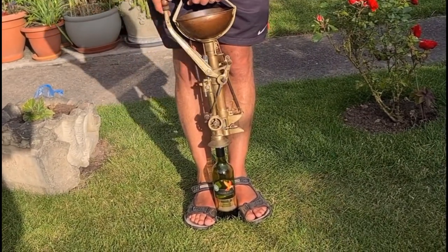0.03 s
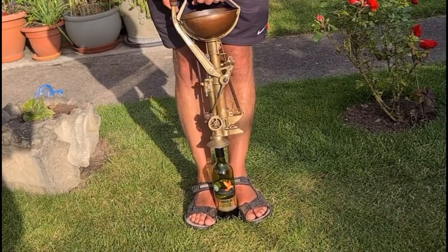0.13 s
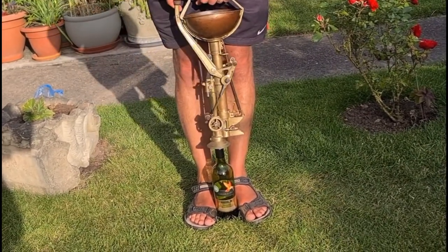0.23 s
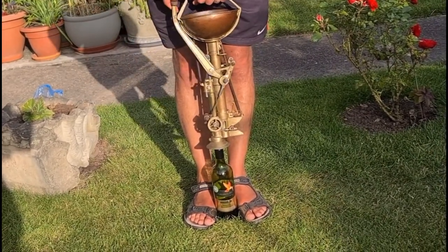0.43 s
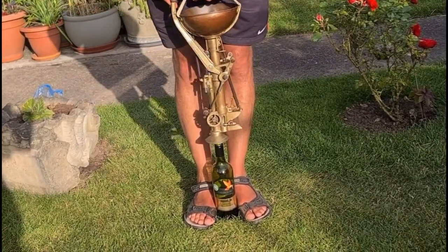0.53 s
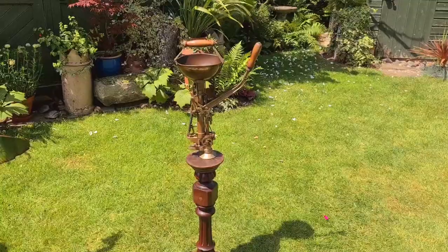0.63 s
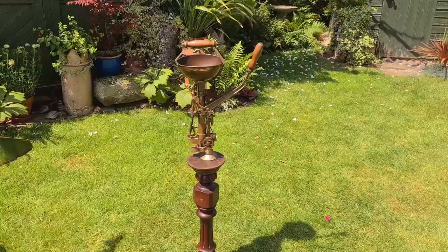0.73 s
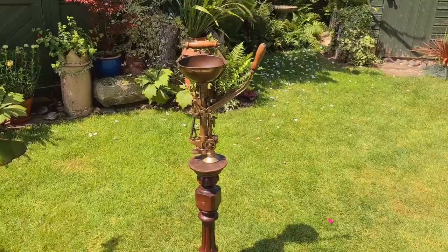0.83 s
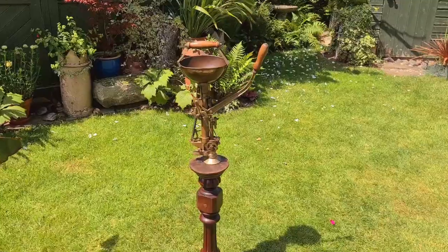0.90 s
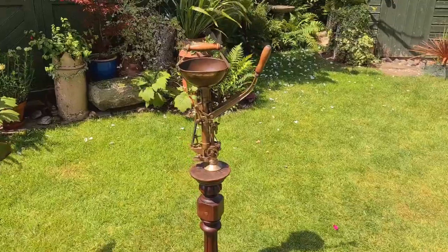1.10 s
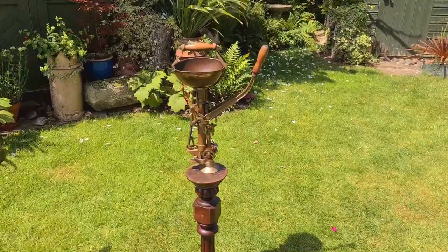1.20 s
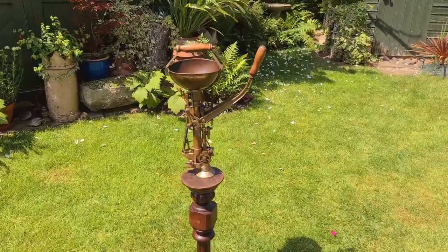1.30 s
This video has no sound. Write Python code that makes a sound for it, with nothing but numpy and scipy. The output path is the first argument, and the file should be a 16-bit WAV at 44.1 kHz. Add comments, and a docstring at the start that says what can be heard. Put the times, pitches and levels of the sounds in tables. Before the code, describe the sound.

A brass lever corker scrapes briefly, seats a cork with a soft knock and gives one sharp, rattling clack. Small birds chirp faintly in the garden. The background cuts out, then wind rumbles and thumps lightly on the microphone.

```python
"""A brass lever corker in a garden. Small birds chirp over calm air. The lever scrapes, the cork seats
with a soft knock, noise swells briefly, and at 0.2 s the plunger hits its stop: one chattering clack,
scattered by fences and the house wall. More chirps and two faint low bumps follow. At 0.63 s the garden
drops out; a breezier spot fades in with rumble, leaf hiss, a far motor's hum and wind thumps on the
microphone."""
import sys
import numpy as np
from scipy import signal
from scipy.fft import rfft, irfft
from scipy.io import wavfile

SR = 44100
rng = np.random.default_rng(int(sys.argv[2]) if len(sys.argv) > 2 else 0)


def store_pcm(level_fs):
    """Save levels as 16-bit WAV."""
    pcm = np.round(np.clip(level_fs, -1, 1) * 32767).astype(np.int16)
    wavfile.write(sys.argv[1], SR, np.atleast_2d(pcm).T)


N = 59535
T = np.arange(N) / SR

# calm air spectrum: freq_hz, level_db
CALM_SPECTRUM = [(25, -12.5), (65, 2), (110, -5.5), (160, -11), (230, -16.5), (370, -12.5), (600, -19.5),
                 (1000, -22), (1700, -27), (2400, -33.5), (3700, -23.5), (5200, -32.5), (7000, -42),
                 (10000, -48.5), (15500, -49.5)]
# bird notes: start_s, length_s, start_hz, end_hz, level_db
CHIRPS = [(-.003, .018, 3770, 3593, -54), (0.009, 0.022, 3400, 2994, -57), (0.03, 0.019, 3200, 2950, -62),
          (0.519, 0.021, 3400, 3740, -68), (0.567, 0.021, 4830, 4703, -61), (0.594, 0.013, 4776, 4600, -57),
          (0.601, 0.0101, 4840, 3570, -55), (0.616, 0.011, 4505, 3950, -58),
          (0.63, 0.0117, 4220, 3700, -56.5)]
# scrapes, last row a noise swell just before the clack: start_s, swell_s, level_db, t60_s, lowpass_hz
SCRAPES_AND_SWELL = [(.068, .006, -50.5, .07, 8500), (0.084, 0.0029, -49, 0.18, 7700),
                     (0.105, 0.0018, -55.5, 0.13, 7900), (0.1625, 0.0046, -40, 0.067, 16000),
                     (0.174, .003, -45, 0.07, 14000), (0.1807, 0.0014, -37, 0.039, 18000),
                     (0.191, 0.0077, -28.5, 0.089, 8360)]
# friction spectrum: freq_hz, level_db
FRICTION_SPECTRUM = [(300, -13.5), (1000, -7.5), (1600, -16), (2800, -8), (4300, -13), (5500, -5),
                     (7500, -4), (10000, -11), (13000, -5.5), (15500, -18.5)]
# cork in the bottle neck: pitch_hz, level_db, t60_s, left_minus_right_db
CORK_MODES = [(376, -9.5, .09, 3.5), (650, -2.5, 0.027, 4.5), (630, 2.5, 0.036, -0.5),
              (1000, -11, 0.0067, 4)]
# brass frame: pitch_hz, level_db, t60_s, left_minus_right_db
FRAME_MODES = [(496, -25, 0.036, -1.5), (730, -12, 0.036, -4), (1009, -6, .024, -2),
               (1217, -14.5, 0.073, 0.5), (1606, -1.5, 0.066, 5), (1790, -4, 0.045, 5.5),
               (2349, -31.5, 0.064, -1), (2473, -26, 0.11, 1.5), (5240, -4.5, .028, 2.5),
               (6294, -10, 0.09, 4), (7390, -18, .08, -3), (8245, -15.5, .08, -5)]
# plunger contacts with its stop: start_s, level_db
CONTACTS = [(.2034, 0), (.2050, 0), (.2085, -11), (.2150, -16), (.2203, -10.5), (.2287, -19)]
# dense ring of the small links: freq_hz, level_db
LINK_SPECTRUM = [(150, -24.5), (300, -13.5), (480, -4), (700, -3), (1100, -1), (1400, -3), (2200, -11.5),
                 (3000, -2), (3400, -5.5), (3900, -1.5), (4700, -4.5), (5300, 3.5), (5600, -0.5),
                 (6300, 1.5), (7000, 1), (8000, 1), (9500, -4), (11600, -8.5), (12150, 3), (13200, -9.5),
                 (13800, -19), (15200, -13.5)]
# scatter from wall and fences: freq_hz, level_db
SCATTER_SPECTRUM = [(250, 7.5), (600, -3.5), (1050, -4), (1600, -12), (1850, -14), (2500, -5), (7000, -6),
                    (10000, -2.5), (12200, -6.5), (15000, -9.5)]
# two faint low bumps in the garden, then wind thumps:
# centre_s, half_width_s, centre_hz, level_db, left_minus_right_db, two_octaves_up_db
BUMPS_AND_THUMPS = [(0.529, 0.0071, 159, -52, -1, -40), (0.606, 0.0081, 228, -59.5, -9, -38),
                    (0.96, 0.017, 74.5, -32.5, 0.5, -23.5), (0.951, 0.0076, 227, -40.5, -7.5, -77),
                    (0.9753, 0.0051, 355, -38.5, 12.5, -24.5), (1.006, 0.022, 79.6, -40.5, -7, -15.5),
                    (1.074, 0.0092, 1270, -53.5, 5, -40), (1.109, 0.013, 357, -44, -8.5, -25),
                    (1.113, 0.013, 222, -46.5, -8.5, -42), (1.21, .012, 325, -48, -7, -40)]
# fade-in of the breezy spot: time_s, rumble_gain_db, hiss_and_motor_gain_db
BREEZE_FADE = [(.68, -63.5, -66.5), (0.732, -19.5, -28.5), (0.776, -27, -37), (0.803, -12, -24.5),
               (0.871, -11.5, -14), (.93, -8, -9), (0.973, 3, -4), (1.05, 7, 0.5), (1.17, 2.5, 0),
               (1.24, 8.5, -0.5), (1.35, 5.5, 1.5)]
# wind rumble spectrum: freq_hz, level_db
RUMBLE_SPECTRUM = [(22, -6), (40, -7), (65, 5.5), (100, -6.5), (160, -13), (350, -24), (600, -34.5),
                   (1500, -69)]
# leaf hiss spectrum: freq_hz, level_db
LEAF_SPECTRUM = [(100, -4), (400, 0), (600, -0.5), (1000, -2.5), (1600, -5.5), (2600, -12), (4700, -13.5),
                 (7500, -31.5), (8100, -69), (8700, -48), (10000, -32.5), (12500, -30.5), (15500, -44)]
# far motor partials: pitch_hz, level_db, left_minus_right_db
MOTOR_PARTIALS = [(75.83, -50, -8.5), (383, -63.5, -9), (738, -63.5, -1.5)]


def amp(db):
    """Decibels to gain."""
    return 10 ** (np.asarray(db) / 20)


def unit(x):
    """Scale to rms 1."""
    return x / np.sqrt(np.mean(x ** 2))


def pan(db):
    """Stereo gains for a left-minus-right level."""
    return amp(np.array([[db], [-db]]) / 2)


def rise(t, length_s):
    """Ramp from 0 to 1, starting at time zero."""
    return np.clip(t / length_s, 0, 1)


def decay(t, t60_s):
    """Silent before time zero, then 60 dB down every t60_s."""
    return (t >= 0) * np.exp(-np.log(1000) * np.maximum(t, 0) / t60_s)


def drift(points):
    """Smooth random curve through evenly spaced points; rms 1."""
    return unit(signal.resample(rng.standard_normal(points), N))


def colour(x, spectrum):
    """Filter by (freq_hz, level_db) points; rms 1."""
    hz, db = np.array(spectrum).T
    bins_hz = np.maximum(np.fft.rfftfreq(N, 1 / SR), 1)
    gain = amp(np.interp(np.log(bins_hz), np.log(hz), db))
    return unit(irfft(rfft(x) * gain, N))


def noise(spectrum):
    """Coloured noise, independent left and right."""
    return colour(rng.standard_normal((2, N)), spectrum)


def butter(x, hz, kind="low", order=2):
    """Butterworth filter."""
    return signal.sosfilt(signal.butter(order, hz, kind, fs=SR, output="sos"), x)


def split(x, hz, order):
    """Zero-phase low and high bands."""
    low = signal.sosfiltfilt(signal.butter(order, hz, fs=SR, output="sos"), x)
    return low, x - low


def ring(force, response):
    """Drive a stereo response."""
    return signal.fftconvolve(np.atleast_2d(force), response, axes=1)[:, :N]


def modes(table, t, waver_share=.009):
    """Decaying partials of a struck body, alternating in sign; loose joints make each waver."""
    out = 0
    for k, (hz, db, t60_s, side_db) in enumerate(table):
        waver_s = np.cumsum((t >= 0) * waver_share * drift(points=400), axis=-1) / SR
        partial = decay(t, t60_s) * np.sin(2 * np.pi * hz * (t + waver_s))
        out = out + (-1) ** k * amp(db) * pan(side_db) * partial
    return out


def calm_air(level_db=-55.5):
    """Distant outdoor murk: bass alike in both ears, treble wide."""
    mid, side = noise(CALM_SPECTRUM)
    side = butter(side, hz=820, kind="high", order=1)
    return amp(level_db + .27 * drift(points=14)) * np.array([mid + side, mid - side])


def birds(echo_db=2):
    """Short gliding whistles, mostly falling, smeared by shrubs."""
    song = 0
    wobble = 1 + .022 * drift(points=500)
    for start_s, length_s, start_hz, end_hz, db in CHIRPS:
        progress = rise(T - start_s, length_s)
        hz = (start_hz + (end_hz - start_hz) * progress) * wobble
        song = song + amp(db) * np.sin(np.pi * progress) * np.sin(2 * np.pi * np.cumsum(hz) / SR)
    shrubs = unit(rng.standard_normal((2, N)) * decay(T, t60_s=.06)) / np.sqrt(N)
    return song + amp(echo_db) * ring(song, shrubs)


def scrapes_and_swell(grains_per_s=3000, spread_db=2):
    """Stick-slip catches of the lever, then a short noise swell just before the clack."""
    slips = rng.random(N) < grains_per_s / SR
    grains = slips * amp(spread_db * rng.standard_normal(N)) * rng.standard_normal(N)
    grain_ring = rng.standard_normal((2, N)) * decay(T, t60_s=.012)
    friction = colour(ring(grains, grain_ring), FRICTION_SPECTRUM)
    out = 0
    for start_s, swell_s, db, t60_s, lowpass_hz in SCRAPES_AND_SWELL:
        envelope = rise(T - start_s, swell_s) * decay(np.maximum(T - start_s - swell_s, 0), t60_s)
        out = out + amp(db) * envelope * butter(friction, lowpass_hz)
    return out


def cork_knock(start_s=.1638, gain_db=-30.5):
    """The cork seats in the bottle neck with a soft knock."""
    t = T - start_s
    return amp(gain_db) * rise(t, length_s=.002) * modes(CORK_MODES, t)


def chatter(ring_t60_s, ring_db=-19.5, crack_t60_s=.019, crack_db=-26.5):
    """Contact envelope: a short crack and a longer ring each, contacts summed in energy."""
    energy = 0
    for start_s, db in CONTACTS:
        crack = amp(db + crack_db) * decay(T - start_s, crack_t60_s)
        tail = amp(db + ring_db) * decay(T - start_s, ring_t60_s)
        energy = energy + (crack + tail) ** 2
    return np.sqrt(energy)


def plunger_clack(start_s=.2031, frame_gain_db=-9.5, left_lag_s=.00003):
    """The blow rings the frame; each contact sets the links clashing, treble dying first."""
    t = T - start_s - np.array([[left_lag_s], [0]])
    frame = amp(frame_gain_db) * rise(t, length_s=.0008) * modes(FRAME_MODES, t)
    links_low, links_high = split(noise(LINK_SPECTRUM), hz=9100, order=3)
    return frame + links_low * chatter(ring_t60_s=.096) + links_high * chatter(ring_t60_s=.056)


def garden_echo(x, scatter_db=-15, scatter_delay_s=.018, wall_db=-32.5, wall_delay_s=.052):
    """Short diffuse echo, treble dying first, then a dull slap from the house wall."""
    scatter = noise(SCATTER_SPECTRUM)
    low = butter(scatter, hz=7100)
    t = T - scatter_delay_s
    tail = low * decay(t, t60_s=.19) + (scatter - low) * decay(t, t60_s=.11)
    slap = butter(rng.standard_normal((2, N)), hz=5000) * decay(T - wall_delay_s, t60_s=.12)
    return ring(x, amp(scatter_db) * unit(tail) + amp(wall_db) * unit(slap)) / np.sqrt(N)


def bumps_and_thumps():
    """Band-noise pulses: two faint low bumps in the garden, then wind thumps."""
    out = 0
    for centre_s, half_width_s, hz, db, side_db, edge_db in BUMPS_AND_THUMPS:
        band = noise([(hz / 4, -14), (hz, 0), (hz * 1.44, -15),
                      (hz * 4, edge_db), (hz * 20, -65), (hz * 200, -130)])
        envelope = np.exp(-((T - centre_s) / half_width_s) ** 2)
        out = out + amp(db) * pan(side_db) * envelope * band
    return out


def wind_rumble(gain_db=-44.5, gust_db=.5):
    """Wind on the microphone, stronger on the right."""
    return amp(gain_db - gust_db * drift(points=20)) * pan(-10) * noise(RUMBLE_SPECTRUM)


def leaf_hiss(gain_db=-52.5):
    """Breeze in leaves, nearly steady."""
    return amp(gain_db + .5 * drift(points=16)) * noise(LEAF_SPECTRUM)


def far_motor(wobble_share=.002, flutter_db=2):
    """Hum whose partials drift together in pitch and flutter separately in level."""
    warped_s = np.cumsum(1 + wobble_share * drift(points=24)) / SR
    out = 0
    for hz, db, side_db in MOTOR_PARTIALS:
        partial = np.sqrt(2) * np.sin(2 * np.pi * hz * warped_s)
        out = out + amp(db + flutter_db * drift(points=22)) * pan(side_db) * partial
    return out


def breezy_spot(treble_lag_s=.029):
    """Rumble, hiss and motor fade in; the top of the hiss lags."""
    time_s, rumble_db, far_db = np.array(BREEZE_FADE).T
    rumble_gain = amp(np.interp(T, time_s, rumble_db))
    far_gain = amp(np.interp(T, time_s, far_db))
    treble_gain = amp(np.interp(T - treble_lag_s, time_s, far_db))
    hiss_low, hiss_high = split(leaf_hiss(), hz=8200, order=6)
    return rumble_gain * wind_rumble() + far_gain * (far_motor() + hiss_low) + treble_gain * hiss_high


def scene(dropout_s=.6332):
    """The corker in calm air, a short gap, then the breezy spot."""
    corker = plunger_clack() + scrapes_and_swell() + cork_knock()
    corker = butter(corker, hz=260, kind="high")  # too small to radiate bass
    garden = corker + garden_echo(corker) + birds() + calm_air()
    dropout = decay(np.maximum(T - dropout_s, 0), t60_s=.038)
    return garden * dropout + breezy_spot() + bumps_and_thumps()


def record(dry, top_hz=15450):
    """Steep low-pass."""
    return signal.sosfilt(signal.ellip(10, .2, 80, top_hz, fs=SR, output="sos"), dry)


dry = scene()
out = record(dry)
store_pcm(out)
```